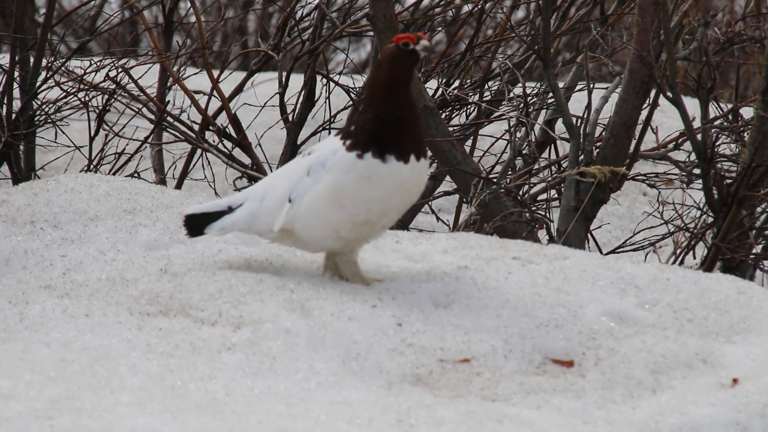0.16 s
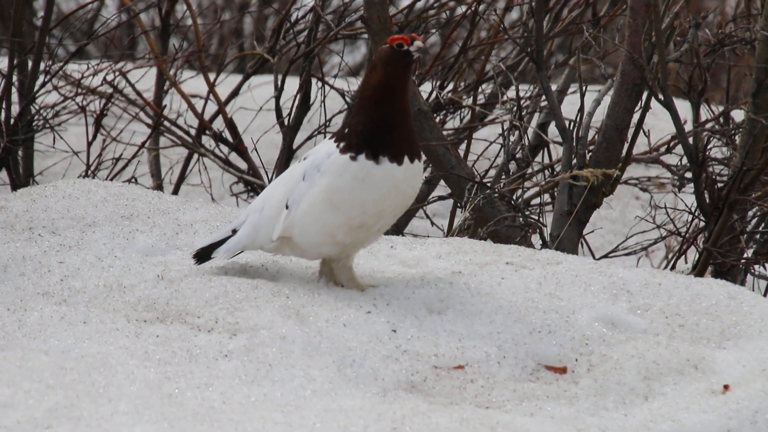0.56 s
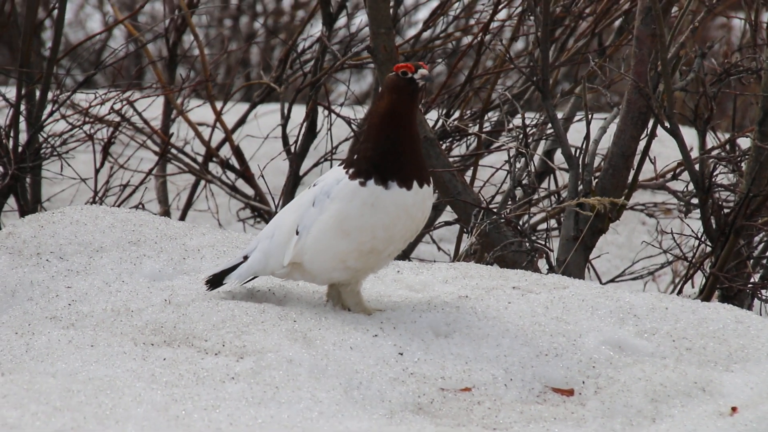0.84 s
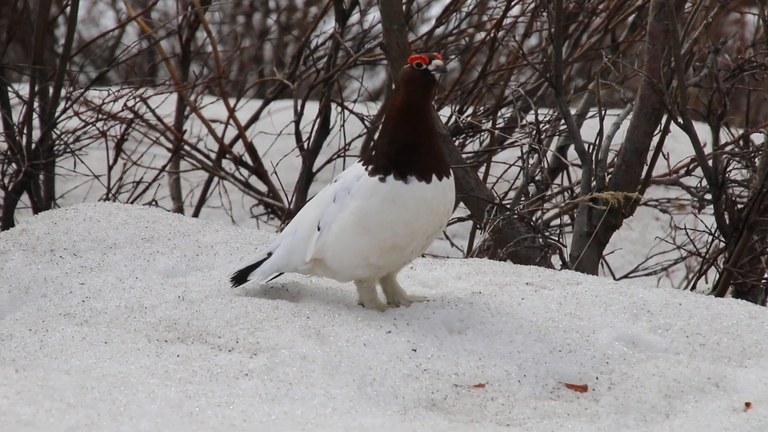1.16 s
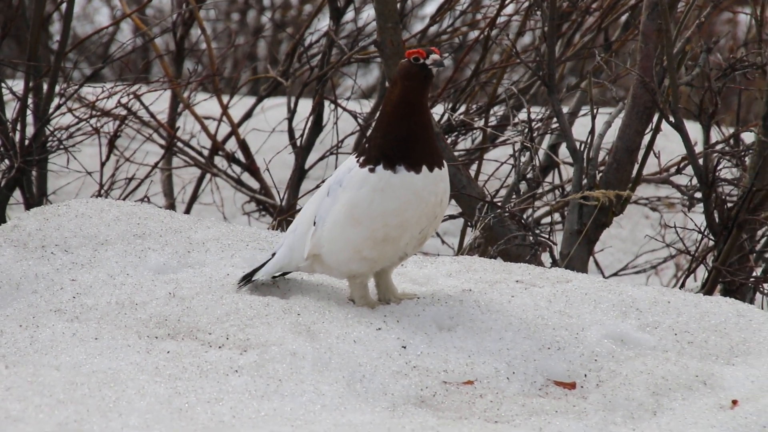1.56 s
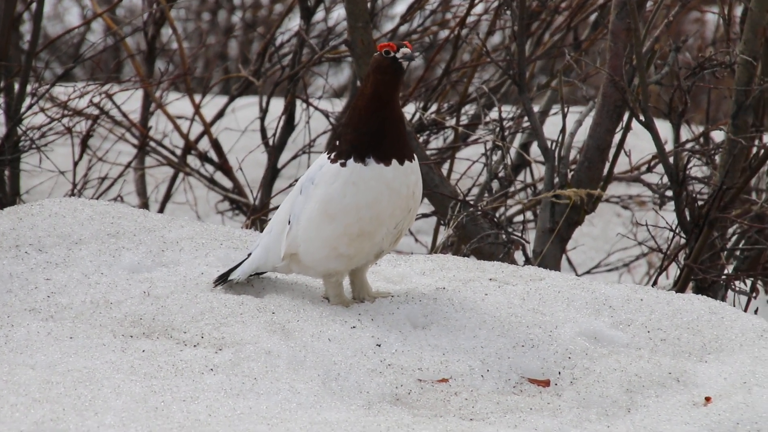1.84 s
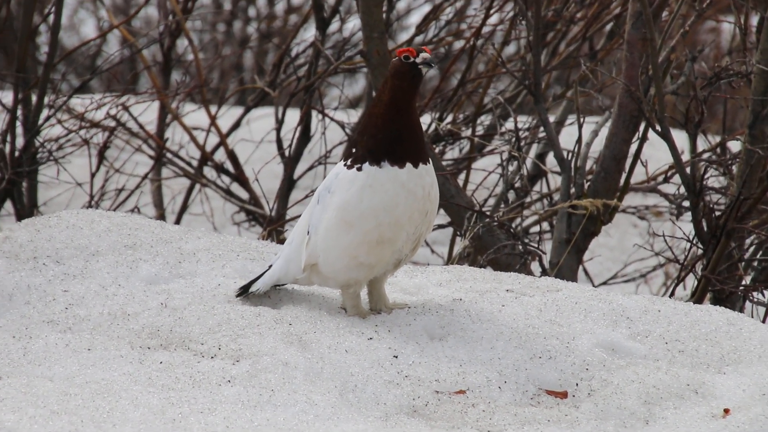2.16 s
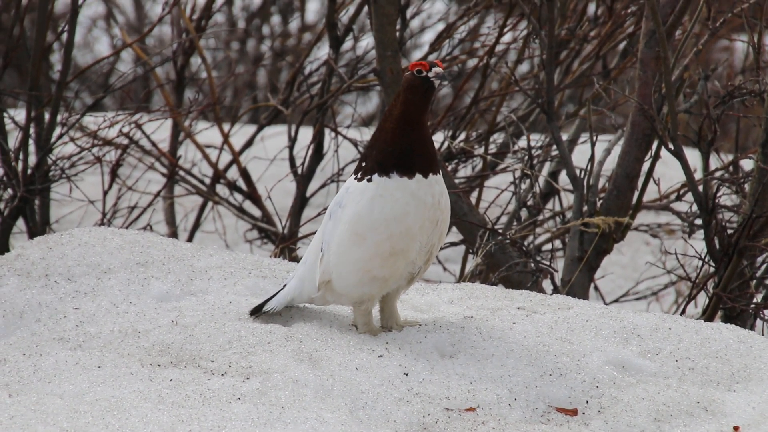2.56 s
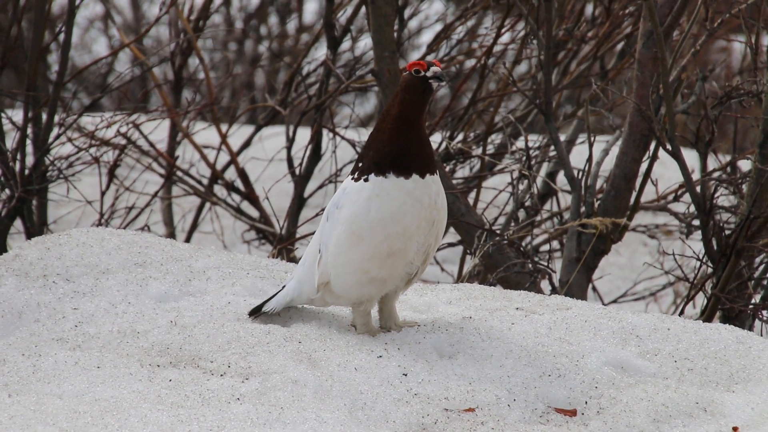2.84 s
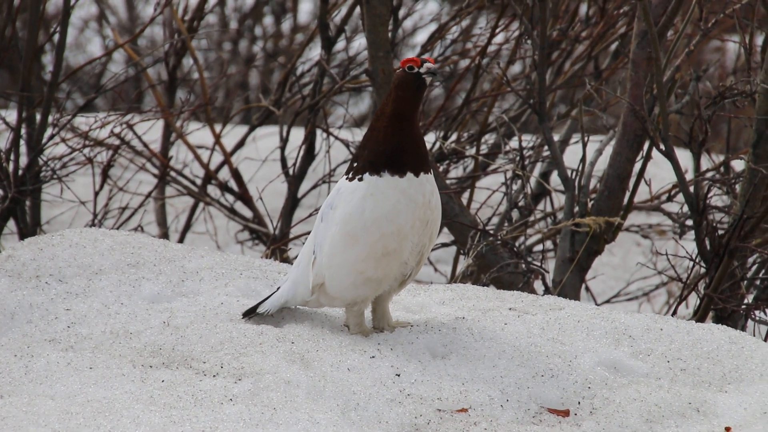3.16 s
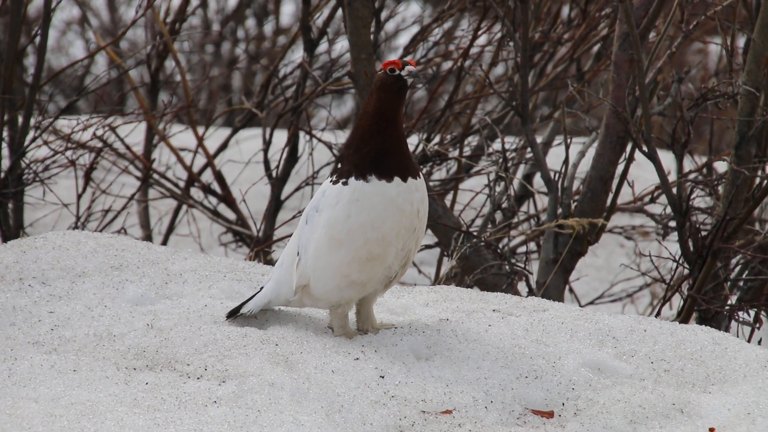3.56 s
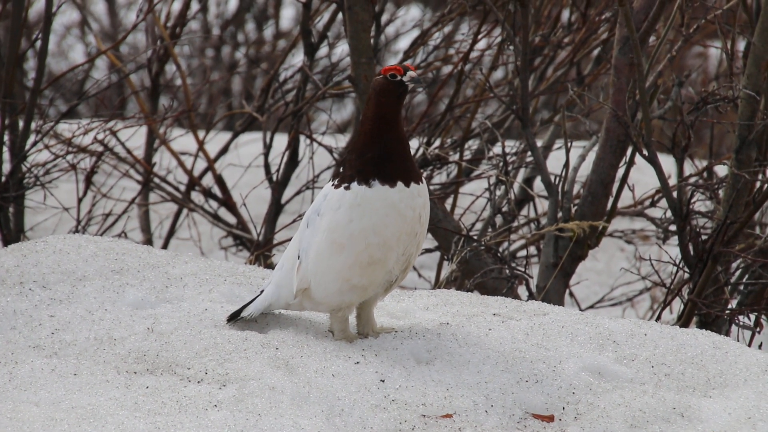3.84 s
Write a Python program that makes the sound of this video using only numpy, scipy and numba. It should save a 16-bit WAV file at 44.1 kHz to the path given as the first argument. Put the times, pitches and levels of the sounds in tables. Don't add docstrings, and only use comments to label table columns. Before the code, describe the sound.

A ptarmigan on snow gives slow croaks that quicken into a hard, dry rattle and stop. Wind buffets the stereo microphone early, and a close camera clacks in two bursts, outdoors near bare thicket.

```python
import sys
import numpy as np
from scipy import signal
from scipy.fft import rfft, irfft
from scipy.io import wavfile
from scipy.ndimage import uniform_filter1d
from numba import njit

SR = 44100
rng = np.random.default_rng(int(sys.argv[2]) if len(sys.argv) > 2 else 0)


def file_out(sig):
    cols = np.atleast_2d(sig).T
    lim = np.clip(cols, -1, 1)
    pcm = np.round(lim * 32767).astype(np.int16)
    wavfile.write(sys.argv[1], SR, pcm)


def makeup_ratio(level_db):
    decades = np.asarray(level_db, float) / 20
    return 10 ** decades


N = 176400

# start_s, level_db, pulse_rate_hz, length_s
CROAK_NOTES = [(0.771, -33.5, 128, 0.018), (1.056, -24, 136.6, 0.0075), (1.304, -22, 145.1, 0.016),
               (1.5311, -20.5, 145, 0.014), (1.6974, -20, 146, 0.013), (1.8323, -19.5, 146, 0.014),
               (1.9489, -17, 158.2, 0.015), (2.0583, -18, 165.5, 0.018), (2.1627, -19, 167, 0.019),
               (2.2625, -18.5, 164.3, 0.018), (2.3592, -18, 172, 0.017), (2.45, -19, 166, 0.017),
               (2.5347, -17.5, 176.9, 0.017), (2.6152, -17.5, 185.1, 0.018), (2.6901, -17.5, 184.6, 0.017),
               (2.7597, -17, 188.1, 0.017), (2.8214, -16.5, 190.9, 0.014), (2.8765, -17, 183.4, 0.015),
               (2.9284, -19, 178.7, 0.016), (2.9787, -17.5, 171.5, 0.014), (3.0268, -19, 156.3, 0.0066),
               (3.0702, -18.5, 170.4, 0.011), (3.1181, -16.5, 170.7, 0.0093), (3.1655, -19, 163, 0.0079),
               (3.2127, -19.5, 170.4, 0.012), (3.2673, -19.5, 151.6, 0.013), (3.327, -34.5, 163.5, 0.0029)]
# start_s, opening_at_note_start, opening_at_note_end, snap_db
BEAK_MOVES = [
    (0.698, 0.12, 0, -22),
    (1.549, 0.18, 0.25, -42),
    (1.85, 0.19, 0.41, -8),
    (2.101, 0.18, 0.63, -5),
    (2.45, 0.22, 0.79, -0.5),
    (2.751, 0.49, 0.89, -1),
    (2.95, 0.81, 0.81, -7),
    (3.35, 0.59, 0.74, -19.5),
]
# closed_hz, half_open_hz, open_hz, width_hz, closed_db, half_open_db, open_db
THROAT_MODES = [(330, 300, 270, 183, -26, -20.5, -23), (833, 855, 763, 152, -5.5, -8, -14),
                (1203, 1700, 2200, 224, -9.5, -15.5, -5.5), (3330, 2580, 2310, 253, -30, -16, -1),
                (3666, 4550, 4090, 350, -28.5, -18.5, -31), (4310, 4950, 5750, 224, -41, -39, -17.5),
                (1940, 1700, 1440, 1050, -19, -14.5, -13.5), (2460, 2680, 2800, 1400, -49, -20, -12.5)]
# closed_hz, open_hz, width_hz, level_db
SNAP_MODES = [(5570, 9840, 1700, -20.5), (8950, 10300, 3100, -22.5), (13600, 10700, 4900, -29)]
# start_s, peak_db, brightness_db, upper_body_db
SHUTTER_STROKES = [(0.2633, -30, -15.5, 5.5), (0.2758, -31.5, -15, 2.5), (0.3245, -33, -22, 6.5),
                   (0.4062, -28, -28, 2.5), (0.4859, -30.5, -33, 1.5), (0.567, -33, -35, 3.5),
                   (0.646, -29.5, -38, 0.5), (1.4197, -50.5, -25, -5), (1.4617, -30, -27.5, 1),
                   (1.6055, -28, -31, 0.5), (1.6871, -30.5, -25, 2.5), (1.7659, -29, -28, -0.5)]
# delay_s, level_db, decay_s, treble_lift_db, knock_db
STROKE_PARTS = [
    (0, -7.5, 0.0039, -3.5, 14),
    (.002, -12, .002, 7, 4.5),
    (.008, -15, .003, 0, 7.5),
    (.012, -22, 0.0085, -6, -10),
]
# centre_hz, width_hz, level_db, side_share
CASE_MODES = [(996, 770, 1, 0.34), (1773, 360, -2.5, 0.84), (2487, 560, -2, 0.86), (3280, 710, -4, 1.1),
              (4290, 770, -14, 1.5), (5200, 880, -24.5, 1.9)]
# centre_hz, width_hz, level_db
PING_MODES = [(7100, 700, -17), (9400, 790, -10), (13200, 2000, -19)]
# time_s, level_db, left_minus_right_db
GUST_LEVELS = [(0, -38.5, 16), (0.129, -51, -2.5), (.5, -23.5, -5), (1.14, -37.5, 0), (1.5, -33, -11),
               (1.949, -37, 13), (2.25, -40.5, -3.5), (2.47, -61.5, 0), (2.8, -60.5, 0), (3.1, -49, 11.5),
               (3.72, -51.5, 4), (4, -61, 0)]
# peak_s, peak_db, bright_part_db
LEFT_EDDIES = [(0.022, -21.5, -54), (0.234, -22, -51), (0.357, -23.5, -10.5), (0.414, -8, -14),
               (0.563, -14.5, 3), (0.612, -9.5, -9), (0.697, -25.5, -11), (0.791, -12.5, -22.5),
               (0.894, -13, -9.5), (1.011, -22.5, -13.5), (1.121, -18, -8), (1.164, -8, -17),
               (1.237, -15, -32), (1.345, -24.5, -19.5), (1.398, -11, -30), (1.433, -18, -31),
               (1.51, -22.5, -21), (1.57, -28.5, -19), (1.648, -16, -30.5), (1.837, -25.5, -30),
               (1.896, -19.5, -18), (1.938, -14.5, -12.5), (2.097, -29.5, -25), (2.314, -34.5, -36),
               (2.435, -38, -34), (3.042, -33.5, -24), (3.109, -43, -34), (3.281, -23, -43),
               (3.586, -39, -50), (3.716, -30.5, -51)]
# peak_s, peak_db, bright_part_db
RIGHT_EDDIES = [(0.248, -45, -29), (0.288, -22, -41), (0.454, -15, -16), (0.494, -21, -2.5),
                (0.544, -16.5, -11), (0.591, -12, -18.5), (0.649, -16, -6), (0.703, -13.5, -41),
                (0.751, -26, -30), (0.835, -18, -40), (0.904, -37, -32), (0.964, -25.5, -21.5),
                (1.1, -28.5, -14), (1.244, -18.5, -25), (1.36, -25.5, -17.5), (1.425, -14.5, -37),
                (1.489, -17, -52), (1.548, -15.5, -49), (1.596, -30, -37), (1.689, -27, -31),
                (1.76, -29.5, -25), (1.989, -23, -25), (2.161, -29, -62), (2.328, -30.5, -72)]
# time_s, pitch_hz, level_db
CHIP_GLIDE = [
    (0.878, 8200, -66),
    (0.89, 7400, -53),
    (0.911, 6300, -56),
    (.936, 6200, -70),
]
# frequency_hz, level_db
AIR_SPECTRUM = [(150, -36), (250, -2), (434, -3), (507, -6), (692, -1.5), (1330, -12.5), (8620, -21.5),
                (15500, -27)]


def unit(x):
    return x / np.sqrt(np.mean(x ** 2))


@njit
def svf(x, hz, width):
    y, band_state, low_state = np.empty(len(x)), 0., 0.
    for i in range(len(x)):
        g, k = np.tan(np.pi * hz[i] / SR), width / hz[i]
        v = (band_state + g * (x[i] - low_state)) / (1 + g * (g + k))
        band_state, low_state = 2 * v - band_state, low_state + 2 * g * v
        y[i] = k * v
    return y


def band(x, hz, width):
    hz = np.zeros(N) + hz
    return svf(svf(x + 1e-18, hz, 1. * width), hz, 1.47 * width)


def walk(rate_hz):
    hold = int(SR / rate_hz)
    steps = np.repeat(rng.standard_normal(N // hold + 1), hold)
    slewed = uniform_filter1d(uniform_filter1d(steps, hold), hold)
    return 1.5 * np.tanh(slewed[:N])


def pan(x, left_minus_right_db):
    return x * makeup_ratio(np.array([[.5], [-.5]]) * left_minus_right_db)


def rasp(x, share):
    flow = signal.lfilter([1], [1, -np.exp(-1 / (0.002 * SR))], abs(x))
    return x + share * flow * rng.standard_normal(N)


def throat_pulses(t):
    jitter, shimmer_db = 0.004, 0.6
    sag, fastest_pulse = 0.01156, 1.596
    pulses, snaps, chest, opening, posture = np.zeros((5, N))
    beak = np.array(BEAK_MOVES).T
    k = np.arange(-1, 9)
    chance = rng.standard_normal((len(CROAK_NOTES), 2, len(k)))
    snap_shape_db = np.where(k < 1, -4.5 * (1 - 2 * k), -7 * np.maximum(k - 2, 0))
    onset_db = np.where(k < 0, -16.5, np.where(k == 0, -5, 0))
    for (start_s, db, hz, length_s), (time_chance, level_chance) in zip(CROAK_NOTES, chance):
        beak_start, beak_end, snap_db = [np.interp(start_s, beak[0], column) for column in beak[1:]]
        drift = sag * ((k - fastest_pulse) ** 3 + fastest_pulse ** 3) / 3
        at_s = (k * (1 + jitter * time_chance) + drift) / hz
        release_db_s = 1010 + 1798 * beak_start ** 2
        release_db = release_db_s * np.maximum(at_s - length_s + .5 / hz, 0)
        level_db = db + onset_db - release_db + shimmer_db * level_chance
        near = np.arange(int((start_s - .015) * SR), int((start_s + .07) * SR))
        gap = near[:, None] - (start_s + at_s) * SR
        click = np.sinc(0.71 * gap) * (abs(gap) < 20) * makeup_ratio(level_db)
        pulses[near] += click[:, 1:].sum(axis=1)
        snaps[near] += click @ makeup_ratio(snap_shape_db + snap_db)
        chest[near] += click[:, 0] + (makeup_ratio(2.5) - 1) * click[:, 1]
        chest[near] += click @ (makeup_ratio(0.27 * beak_start * release_db) - 1)
        progress = np.clip((t[near[0]:] - start_s) / (length_s + 0.0054), 0, 1)
        opening[near[0]:] = beak_start + (beak_end - beak_start) * progress
        posture[near[0]:] = (beak_start + beak_end) / 2
    return pulses, snaps, chest, opening, posture


def ptarmigan(t):
    pulses, snaps, chest, opening, posture = throat_pulses(t)
    move = opening - posture
    upper_opening = posture + 0.75 * move
    drive, crack = rasp(pulses, 0.018), rasp(snaps, 0.108)
    out = np.zeros(N)
    for n, row in enumerate(THROAT_MODES):
        gape = upper_opening if n in (3, 4, 5, 7) else opening
        hz, db = [np.interp(gape, (0.15, 0.41, 1), values) for values in (row[:3], row[4:])]
        width_hz = row[3]
        source = drive
        if n < 3:
            source = drive + chest * (1 - opening * (n == 2))
        if n in (3, 4, 5):
            db = db + 7.5 * move
        out += (-1) ** n * makeup_ratio(db) * band(source, hz, width_hz) * SR / width_hz / 3
    for closed_hz, open_hz, width_hz, db in SNAP_MODES:
        hz = closed_hz + (open_hz - closed_hz) * opening
        out += makeup_ratio(db) * band(crack, hz, width_hz) * SR / width_hz / 3
    return out * makeup_ratio(-1.5)


def thicket_echo(bird):
    lag_s = np.arange(SR // 2) / SR
    envelope = makeup_ratio(-60 * lag_s / 0.3) * np.minimum(lag_s / 0.0009, 1)
    mid, side = rng.standard_normal((2, len(lag_s))) * envelope
    tails = [unit(tail) / np.sqrt(len(lag_s)) for tail in (mid + side, mid - side)]
    source = band(bird, 2320, 3700)
    return makeup_ratio(-17.5) * np.array([signal.fftconvolve(source, tail)[:N] for tail in tails])


def ring_case(layers, sideways):
    out = 0.74 * band(layers[2], 7300, 11000)
    for n, (hz, width_hz, db, side_share) in enumerate(CASE_MODES):
        gain = (-1) ** n * makeup_ratio(db) * side_share ** sideways * np.sqrt(3000 / width_hz)
        body = band(layers[int(hz > 2200)], hz, width_hz)
        out = out + gain * band(body, hz, 3 * width_hz)
    return out


def mirror(t, noise):
    tick_s, ping_s = 0.269, 0.2775
    envelope = np.exp(-abs(t - tick_s) / np.where(t > tick_s, 0.036, .002))
    tick = makeup_ratio(-38.5) * envelope * unit(band(noise, 930, 470))
    strike = 1. * (np.arange(N) == int(ping_s * SR))
    ping = sum(makeup_ratio(db) * band(strike, hz, width_hz) for hz, width_hz, db in PING_MODES)
    return tick + pan(ping, 3)


def shutter(t):
    scrape, knock = np.zeros((2, 3, N))
    for start_s, db, bright_db, body_db in SHUTTER_STROKES:
        for delay_s, part_db, decay_s, lift_db, knock_db in STROKE_PARTS:
            age_s = np.maximum(t - start_s - delay_s, 0)
            colour = makeup_ratio(np.array([[0], [body_db + lift_db], [bright_db]]))
            envelope = np.exp(-age_s / decay_s) * (1 - np.exp(-age_s / 0.00032))
            scrape += colour * makeup_ratio(db + part_db) * envelope
            knock[:, int((start_s + delay_s) * SR)] += colour[:, 0] * makeup_ratio(db + knock_db)
    mid, side = rng.standard_normal((2, N)) * makeup_ratio(3.2 * walk(900))
    together = ring_case(mid * scrape + knock, False)
    late_knock = np.roll(knock, shift=5, axis=1)
    apart = ring_case(side * scrape + 0.67 * late_knock, True)
    return 2.19 * (together + apart * np.array([[1], [-1]])) + mirror(t, mid)


def rumble_band(x, hz, width_hz):
    return unit(band(band(x, hz, width_hz), hz, 2 * width_hz))


def wind(t):
    time_s, db, pan_db = np.array(GUST_LEVELS).T
    ports = []
    for side, eddies in ((.5, LEFT_EDDIES), (-.5, RIGHT_EDDIES)):
        noise = rng.standard_normal((5, N))
        rumble = rumble_band(noise[0], 99.9, 85.6) + makeup_ratio(-0.5) * rumble_band(noise[4], 60, 61.7)
        bed = rumble * makeup_ratio(np.interp(t, time_s, db + side * pan_db) + 3.5 * walk(18))
        bumps = [(np.exp(-((t - peak_s) / .018) ** 2), makeup_ratio(peak_db), makeup_ratio(bright_db))
                 for peak_s, peak_db, bright_db in eddies]
        rise = sum(bump * np.sqrt(np.minimum(bright, .5)) for bump, _, bright in bumps)
        thud = rumble_band(noise[1], 86.3 * (1 + 1.93 * rise), 98.3)
        thud = thud / np.sqrt(2 * uniform_filter1d(thud ** 2, size=700) + 1e-9)
        rush = rumble_band(noise[2], 283, 273) + makeup_ratio(-28.5) * rumble_band(noise[3], 855, 507)
        thud_level = sum(bump * peak for bump, peak, _ in bumps)
        rush_level = sum(bump * bump * peak * bright for bump, peak, bright in bumps)
        ports.append(bed + thud * thud_level + rush * rush_level)
    return np.array(ports)


def chip(t):
    time_s, pitch_hz, db = np.array(CHIP_GLIDE).T
    hz = np.interp(t, time_s, pitch_hz) * (1 + 0.03 * walk(400))
    phase = 2 * np.pi * np.cumsum(hz) / SR
    level = (t > time_s[0]) * (t < time_s[-1]) * makeup_ratio(np.interp(t, time_s, db))
    return level * (np.sin(phase) + makeup_ratio(-15) * np.sin(2 * phase))


def air():
    hz = np.maximum(np.fft.rfftfreq(N, 1 / SR), 30)
    spectrum_hz, spectrum_db = np.array(AIR_SPECTRUM).T
    gain = makeup_ratio(np.interp(np.log(hz), np.log(spectrum_hz), spectrum_db)) * np.minimum(hz / 200, 1)
    mid, side = [irfft(rfft(rng.standard_normal(N)) * unit(gain) * width, N)
                 for width in (1, np.minimum(hz / 1300, 1))]
    return makeup_ratio(-57.5 + 0.09 * walk(2.6)) * (mid + side * np.array([[1], [-1]]))


def scene():
    t = np.arange(N) / SR
    bird = ptarmigan(t)
    return pan(bird, -0.3) + thicket_echo(bird) + shutter(t) + wind(t) + chip(t) + air()


def top_cut(x):
    return signal.sosfilt(signal.butter(12, 16420, fs=SR, output="sos"), x)


def record(dry):
    low_pass = signal.ellip(8, .2, 70, 15800, fs=SR, output="sos")
    mix = signal.sosfilt(low_pass, dry)
    return top_cut(mix)


dry = scene()
out = record(dry)
file_out(out)
```